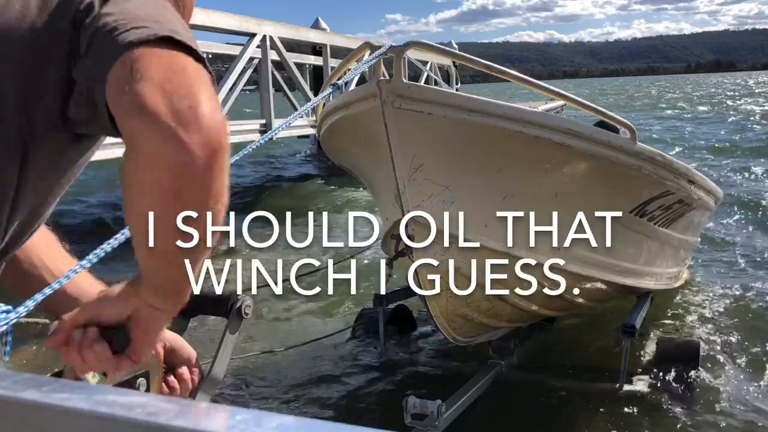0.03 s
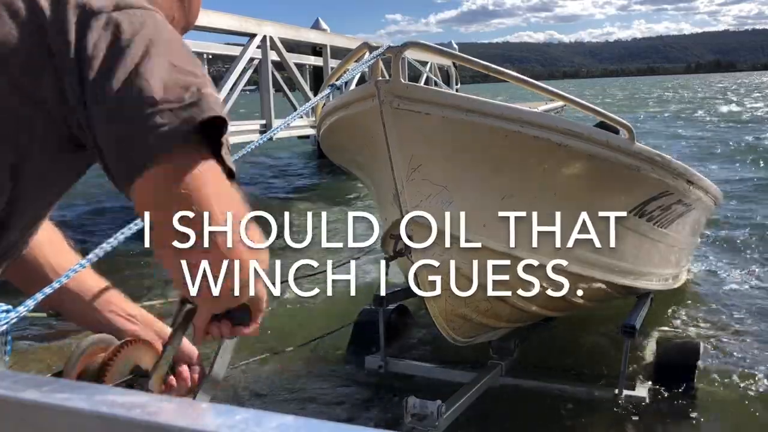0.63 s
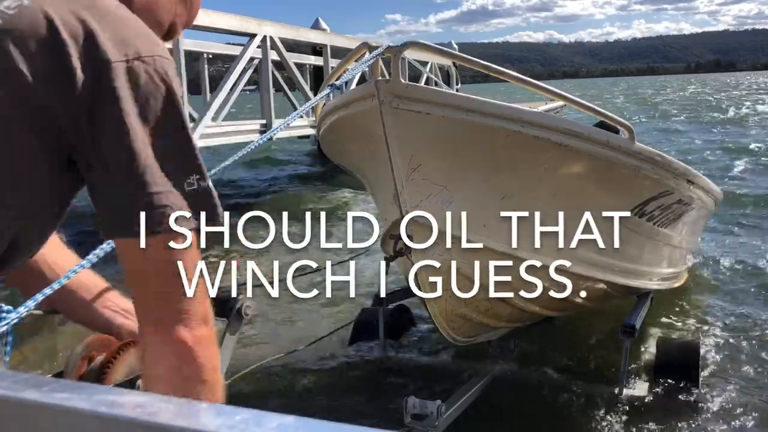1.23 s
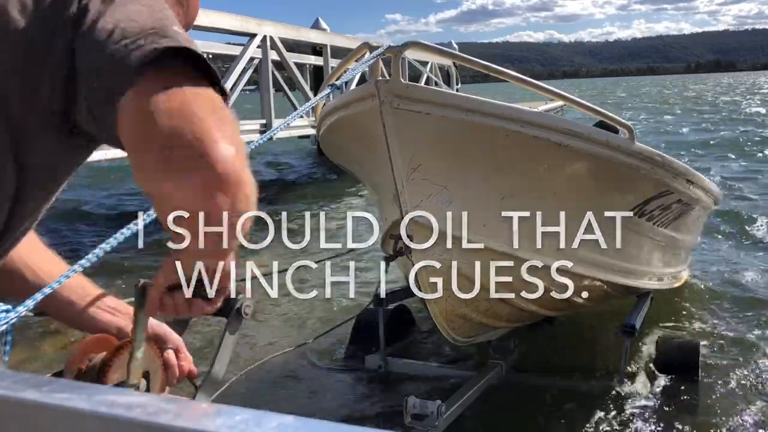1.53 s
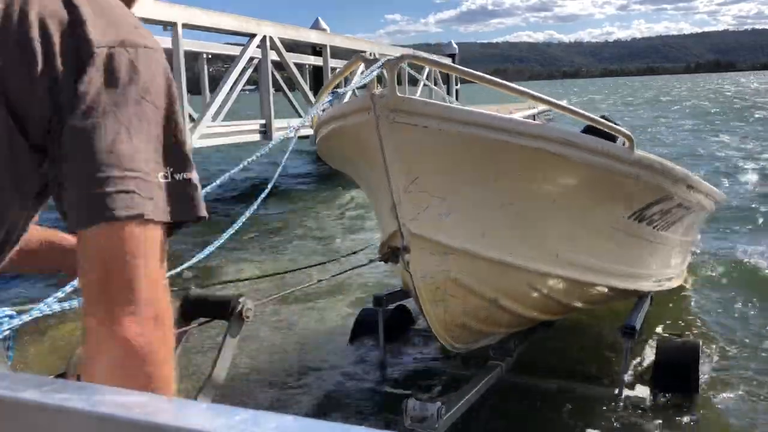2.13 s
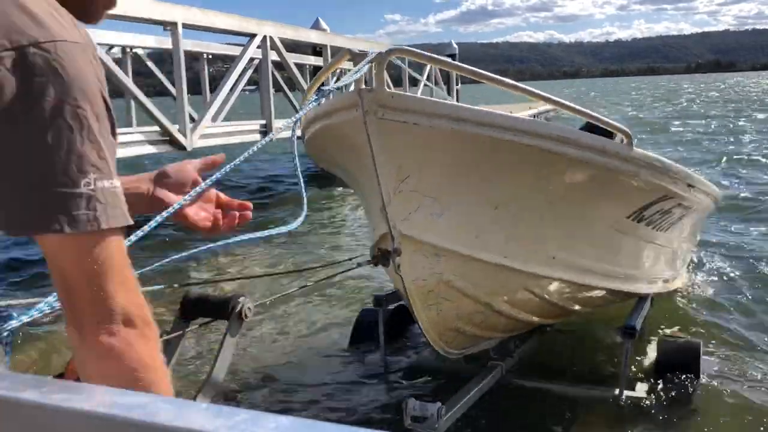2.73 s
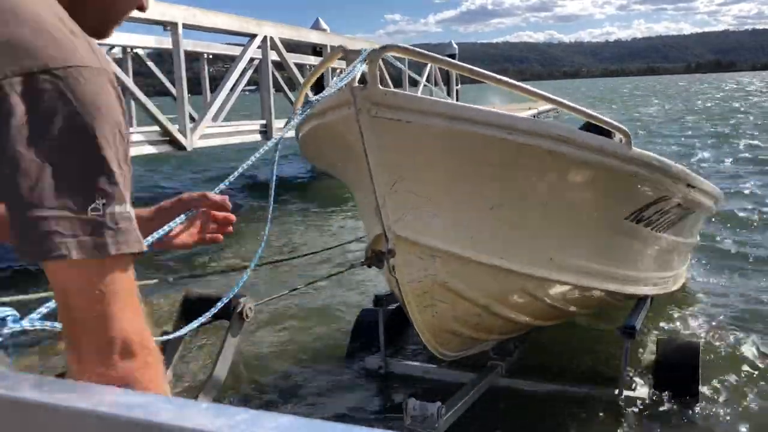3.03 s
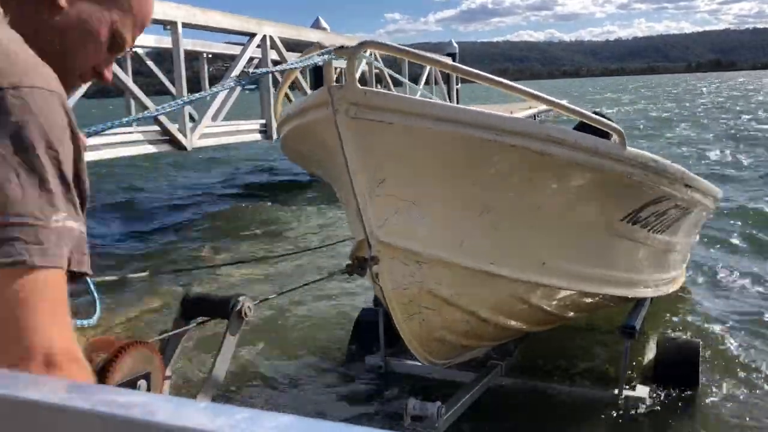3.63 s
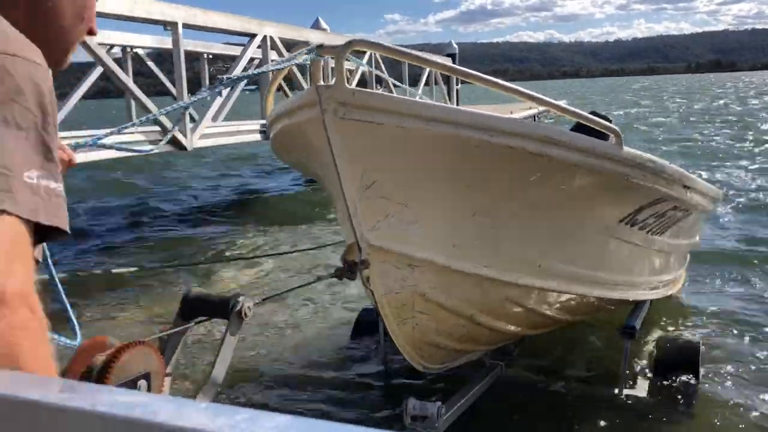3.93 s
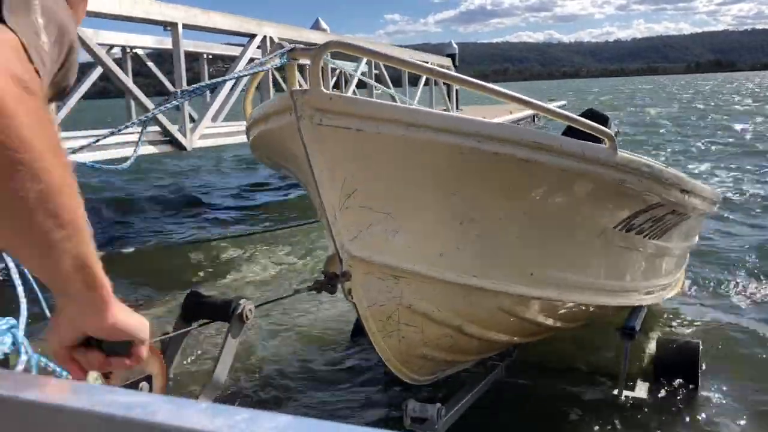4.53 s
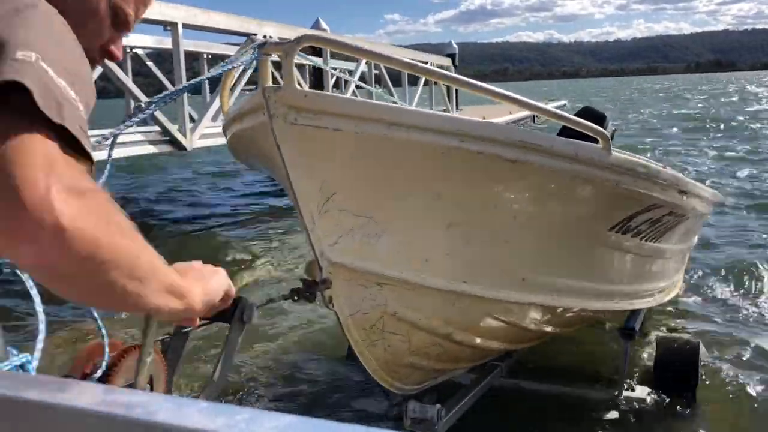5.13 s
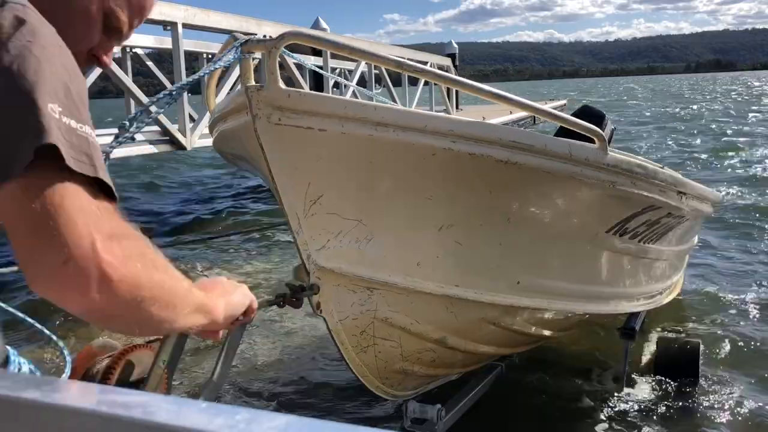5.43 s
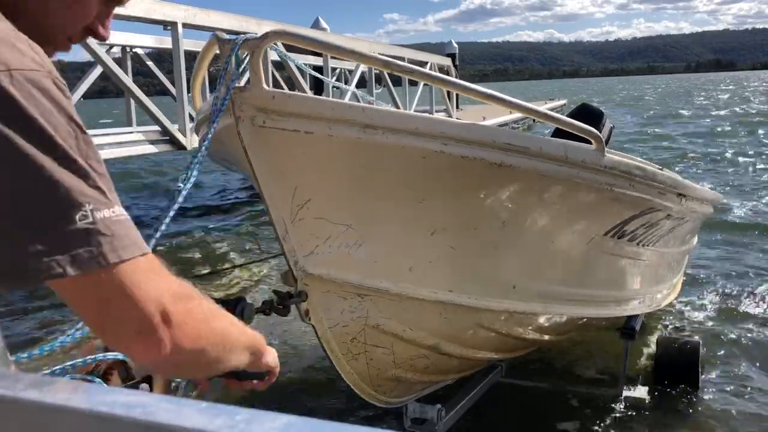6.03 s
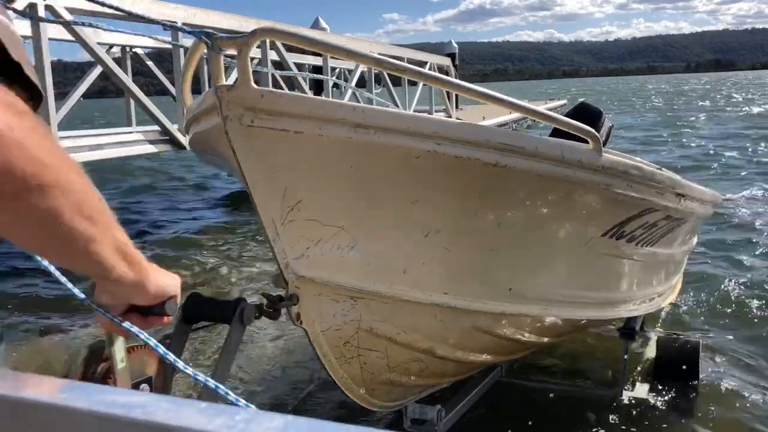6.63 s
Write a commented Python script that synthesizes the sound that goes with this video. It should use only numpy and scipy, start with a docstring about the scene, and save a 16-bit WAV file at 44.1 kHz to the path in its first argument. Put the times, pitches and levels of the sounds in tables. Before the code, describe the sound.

A dry hand winch on a boat trailer is cranked close to the microphone, outdoors by choppy water. At first it turns slowly, each gear tooth chirping and scraping while gusts thump the microphone and waves wash. After about two seconds it spins faster, repeating a squeak, squeal and thin whistle with each turn among ringing ratchet clacks. Near the end it pauses, then makes one more turn over softer wind and water.

```python
"""Choppy water washes and gusts buffet the microphone as a dry hand winch hauls a boat onto its trailer.
Cranked slowly under load, each gear tooth chirps and scrapes by stick-slip friction. The level dips briefly as
the scene changes, and the winch spins fast: each turn runs through squeak, squeal with scraping, whistle and,
at full speed, chatter. The ratchet clacks by impact, and the steel frame resonates with the mechanism."""
import sys
import numpy as np
from scipy import signal
from scipy.fft import rfft, irfft
from scipy.io import wavfile
from scipy.ndimage import uniform_filter1d, map_coordinates

SR = 44100
rng = np.random.default_rng(int(sys.argv[2]) if len(sys.argv) > 2 else 0)


def put_to_file(sound):
    """Save the sound as 16-bit audio at rate SR, in the file named by the first command-line argument."""
    columns = np.atleast_2d(sound).T  # one column per channel
    safe = np.clip(columns, -1, 1)
    whole_steps = np.round(safe * 32767)
    wavfile.write(sys.argv[1], SR, whole_steps.astype(np.int16))


N = 304290
T = np.arange(N) / SR

FAST_FROM_S = 1.876  # the scene changes: slow, heavy cranking, then fast, light spinning
FULL_SPEED_FROM_S, FULL_SPEED_TO_S = 2.4, 5.5
SQUEAK_PLACE, SQUEAK_SHARE = -.1, .11  # shares of a fast turn, counted from its squeal
BAND_LIMIT_HZ = 16050
# Strength of the weather: (t/s, wind level/dB, water level/dB). Levels are relative within each source.
WEATHER = [(0.0, -44, -33.5), (1.61, -43, -33.5), (2.04, -55.5, -41.5), (3.5, -49, -51),
           (4.4, -56.5, -49.5), (5.07, -49.5, -47.5), (5.44, -53.5, -51), (5.882, -45.5, -52),
           (6.19, -56, -45), (6.9, -53.5, -44.5)]


def gain_of(db):
    """Amplitude ratio: tenfold for every 20 dB."""
    return 10 ** (np.asarray(db) / 20)


def unit_rms(x):
    """Normalisation to a mean power of one."""
    return x / np.sqrt(np.mean(x ** 2) + 1e-20)


def add(mix, s, sound):
    """Superposition: a sound joins the mix at s seconds."""
    part = mix[max(round(s * SR), 0):][:len(sound)]
    part += sound[:len(part)]


def wander(n, hz):
    """Smooth random modulation of about unit spread, with a bandwidth near hz."""
    knots = rng.standard_normal(8192)
    coarse = np.arange(0, n + 16, 16)
    curve = map_coordinates(knots, [coarse * 2 * hz / SR], order=3, mode="wrap")
    return np.interp(np.arange(n), coarse, curve)


def butterworth(x, order, hz, kind="low"):
    """Filtering with a maximally flat passband."""
    return signal.sosfilt(signal.butter(order, hz, kind, fs=SR, output="sos"), x)


def colour(x, spectrum, lo_hz=0, hi_hz=SR, size=4096):
    """Minimum-phase filtering; unit white noise comes out with unit power between lo_hz and hi_hz."""
    hz = np.fft.rfftfreq(size, 1 / SR)
    f, db = np.transpose(spectrum)
    gain = gain_of(np.interp(np.log(hz + 1), np.log(f), db))
    gain /= np.sqrt(np.mean(gain ** 2 * ((hz > lo_hz) & (hz < hi_hz))))
    cepstrum = irfft(np.log(gain + 1e-6))
    cepstrum[1:size // 2] *= 2
    cepstrum[size // 2 + 1:] = 0
    return signal.oaconvolve(x, irfft(np.exp(rfft(cepstrum))))[:N]


def swell(length_s, peak_share, edge_s):
    """Rise and fall with energy proportional to length, widened by two edges: (progress, envelope)."""
    length_s = max(length_s, .004)
    u = np.linspace(0, 1, int((length_s + 2 * edge_s) * SR))
    shape = np.sin(np.pi * np.interp(u, [0, peak_share, 1], [0, .5, 1]))
    return u, shape * np.sqrt(length_s * SR / np.sum(shape ** 2))


def by_chance(per_s, spread_db, end_s):
    """A jittered pulse train, one event at random in each interval: (t/s, level offset/dB)."""
    place, size = rng.random((256, 2)).T
    times = (np.arange(len(place)) + place) / per_s
    offsets_db = spread_db * np.sqrt(3) * (2 * size - 1)
    return np.transpose([times, offsets_db])[times < end_s]


def water():
    """Modulated noise: wash of small waves, with faint recorder hiss in the treble, and spattering spray."""
    # Spectrum of the wash, with faint recorder hiss from 8 to 16 kHz: (f/Hz, level/dB)
    wash_and_hiss_spectrum = [(60, -16), (180, -4.5), (600, 1.5), (1000, 3.5), (1600, -1.5), (2800, -3.5),
                              (4500, -7), (8000, -14.5), (16000, -16)]
    # Spectrum of the spray off the wave crests: (f/Hz, level/dB)
    spray_spectrum = [(200, -33), (600, -0.5), (1600, 14.5), (3000, -14.5), (8000, -31)]
    times, _, water_db = np.transpose(WEATHER)
    noise = rng.standard_normal(N) * gain_of(.55 * wander(N, 41))
    wash_and_hiss = colour(noise, wash_and_hiss_spectrum, 480, 3600)
    spray = rng.standard_normal(N) * unit_rms(gain_of(5.3 * wander(N, 30)))
    spray = colour(spray, spray_spectrum, 700, 1900)
    return gain_of(np.interp(T, times, water_db)) * (gain_of(-7) * wash_and_hiss + gain_of(-10.5) * spray)


def eddies():
    """Pressure pulses: strong eddies strike the microphone, and small ones ride on the steady wind."""
    # The strongest eddies: (t/s, length/s, level/dB)
    strong = [(.065, 0.013, -19), (.171, 0.02, -19.5), (.197, 0.032, -27.5), (.266, 0.018, -24.5),
              (.457, 0.014, -14), (.497, 0.02, -20), (1.037, 0.02, -24.5), (1.19, 0.02, -17),
              (1.228, 0.01, -14.5), (1.414, .027, -24), (1.484, 0.031, -21.5), (1.733, 0.031, -31),
              (1.936, 0.027, -31.5), (2.394, .013, -33.5), (2.737, 0.045, -35), (3.043, 0.037, -31),
              (3.174, 0.013, -32.5), (3.353, 0.013, -33.5), (4.054, 0.092, -43), (4.566, 0.015, -31.5),
              (4.622, 0.024, -34.5), (5.018, .03, -33), (5.067, 0.022, -27.5), (5.098, 0.024, -29.5),
              (5.178, 0.031, -33), (5.646, 0.05, -28.5), (5.714, 0.0038, -28.5), (5.87, 0.0054, -31),
              (5.915, 0.02, -26), (5.942, 0.011, -31.5), (5.982, 0.042, -26.5), (6.038, 0.06, -36),
              (6.269, 0.034, -41.5), (6.88, 0.014, -35.5)]
    times, wind_db, _ = np.transpose(WEATHER)
    small = [(s, .018, np.interp(s, times, wind_db) + 7 + db)
             for s, db in by_chance(per_s=9, spread_db=3, end_s=N / SR)]
    out = np.zeros(N)
    for s, length, db in strong + small:
        _, shape = swell(length, peak_share=.21, edge_s=.0034)
        flutter = unit_rms(gain_of(3 * wander(len(shape), 130)))
        eddy = butterworth(shape * flutter * rng.standard_normal(len(shape)), 2, 2500)
        force = np.std(butterworth(eddy, 1, [220, 800], "band"))
        add(out, s - .002, gain_of(db - 15) * eddy / force)
    return out


def wind():
    """Turbulence on the microphone: a lumpy rumble, with sharp puffs that leave a slower thud behind."""
    # Wind spectra during the slow and the fast cranking: (f/Hz, level/dB)
    heavy_spectrum = [(20, -25), (60, 5), (130, 0), (280, -4.5), (600, -5), (1000, -16.5), (1700, -28.5),
                      (4000, -105)]
    light_spectrum = [(30, -48), (70, -10.5), (130, 1.5), (300, 0), (650, -4.5), (1200, -9), (2000, -19),
                      (4000, -29.5)]
    thud_spectrum = [(20, -42), (70, 1.5), (190, 2.5), (450, -19.5), (1500, -92.5)]
    times, wind_db, _ = np.transpose(WEATHER)
    gusts = gain_of(np.interp(T, times, wind_db) + 3.8 * wander(N, 26))
    rumble = butterworth(gusts * rng.standard_normal(N), 1, 450)
    puffs = eddies()
    lag = np.exp(-1 / (.021 * SR))  # time constant 21 ms
    wake = signal.lfilter([1 - lag], [1, -lag], abs(puffs))
    thud = colour(wake * rng.standard_normal(N), thud_spectrum)
    heavy = colour(gain_of(-.5) * puffs + gain_of(3.5) * rumble, heavy_spectrum, 160, 1600)
    heavy += gain_of(14) * thud
    light = colour(gain_of(1.3) * puffs + gain_of(7) * rumble, light_spectrum, 196, 1400)
    light += gain_of(7) * butterworth(thud, 4, 85, "high")
    return np.where(T < FAST_FROM_S, heavy, light)


def teeth():
    """Gear meshing under load, one contact per tooth: (t/s, whistle level/dB, scrape level/dB)."""
    # Runs of evenly spaced teeth: (t/s, number of teeth, whistle level/dB, scrape level/dB)
    mesh = [(0.034, 1, -24.5, -25), (.083, 1, -28, -42), (0.138, 2, -25.5, -25.5), (.231, 2, -29.5, -32),
            (0.312, 1, -31, -27.5), (.356, 3, -25, -29.5), (0.513, 1, -26, -26), (.559, 1, -22, -24),
            (.613, 2, -28, -42), (.712, 1, -46, -54), (0.79, 1, -25, -40), (.84, 1, -46, -34),
            (0.892, 1, -23, -27), (0.956, 2, -40, -25), (1.03, 1, -29, -43.5), (1.087, 1, -31.5, -56),
            (1.142, 1, -55, -50), (1.2, 1, -52, -59), (1.255, 1, -26.5, -26.5), (1.3, 1, -31, -30),
            (1.356, 1, -25.5, -22.5), (1.409, 1, -24, -35), (1.458, 1, -25, -23), (1.512, 1, -20, -25),
            (1.566, 1, -27, -47), (1.623, 1, -14, -21), (1.667, 1, -19.5, -25), (1.704, 1, -27, -31.5),
            (1.747, 1, -24.5, -33), (1.79, 1, -35, -32.5), (1.842, 1, -28.5, -40)]
    times, count, whistle_db, scrape_db = np.transpose(mesh)
    first = np.cumsum(count) - count
    tooth = np.arange(first[-1] + 1)
    return np.transpose([np.interp(tooth, first, column) for column in (times, whistle_db, scrape_db)])


def fast_turns():
    """Rotation repeats the same rubs: each turn's row, with its period/s inserted as second column."""
    # Fast turns, each counted from its squeal: (t/s, squeal level/dB, squeal f/Hz, scrape level/dB,
    # squeak level/dB, whistle level/dB, whistle delay/s, whistle length/s)
    turns = [(1.77, -60, 2210, -47, -60, -26.5, 0.14, 0.13),
             (2.135, -38, 2230, -38.5, -55, -24, 0.14, 0.092),
             (2.447, -39, 2250, -34.5, -37.5, -27, 0.15, .088),
             (2.78, -36, 2268, -35.5, -57, -24, 0.14, .08),
             (3.069, -31, 2248, -35, -43, -22.5, 0.16, 0.067),
             (3.382, -30.5, 2247, -31.5, -36.5, -22.5, 0.13, 0.072),
             (3.647, -30, 2204, -30, -32, -23.5, 0.12, 0.079),
             (3.915, -31, 2272, -30, -31.5, -23.5, .108, 0.11),
             (4.183, -32.5, 2307, -30.5, -36.5, -22.5, 0.11, .074),
             (4.434, -31, 2305, -30, -30.5, -22, 0.14, 0.064),
             (4.704, -28, 2258, -32, -32, -22.5, .132, 0.07),
             (4.978, -27.5, 2290, -29.5, -37, -22, 0.14, 0.069),
             (5.254, -28, 2280, -32.5, -34.5, -24.5, .14, 0.081),
             (5.565, -31, 2307, -35.5, -41.5, -23, 0.16, 0.08),
             (6.489, -31.5, 2307, -35.5, -55, -28.5, .128, .11)]
    rows = np.array(turns)
    period_s = np.minimum(np.diff(rows[:, 0], append=np.inf), .34)  # in a longer wait the handle rests
    return np.insert(rows, 1, period_s, axis=1)


def stick_slip(hz, harmonics_db, jitter, jitter_hz, flutter_db, flutter_hz):
    """Stick-slip oscillation: the pitch trembles and each harmonic flutters as the grip changes."""
    n = len(hz)
    phase = 2 * np.pi * np.cumsum(hz * (1 + jitter * wander(n, jitter_hz))) / SR
    grip = unit_rms(gain_of(flutter_db * wander(n, flutter_hz)))
    tone = np.zeros(n)
    for k, db in enumerate(harmonics_db, 1):
        flutter = unit_rms(gain_of(flutter_db / 2 * wander(n, flutter_hz)))
        if k * hz.mean() < SR / 2:
            tone += gain_of(db) * np.sqrt(2) * flutter * np.sin(k * phase)
    return grip * tone


def whistle_strokes():
    """Intermittent grip, once a slow tooth, twice a fast turn: (t/s, length/s, level/dB, two f/Hz)."""
    # The whistle catches, lets go and catches again:
    # (place and length as shares of the whistle, level/dB, first f/Hz, last f/Hz)
    bursts = [(.02, 0.36, .5, 12090, 11820), (.5, 0.49, -0.5, 12170, 12190)]
    rows = []
    for s, db, _ in teeth():
        length = .021 * np.exp(.42 * min(db + 27.5, 0))  # weaker chirps are also shorter
        rows.append((s, length, db, 12650, 12530))
    for s, *_, db, delay, length in fast_turns():
        rows += [(s + delay + place * length, share * length, db + burst_db, first_hz, last_hz)
                 for place, share, burst_db, first_hz, last_hz in bursts]
    return rows


def whistles():
    """Friction excites the bearing's highest mode: abrupt chirps under load, longer bursts when fast."""
    out = np.zeros(N)
    for s, length, db, first_hz, last_hz in whistle_strokes():
        if s < FAST_FROM_S:
            u, shape = swell(length, peak_share=.35, edge_s=.0013)
            lead_s, grip = .003, dict(jitter=.008, jitter_hz=420, flutter_db=2, flutter_hz=260)
        else:
            u, shape = swell(length, peak_share=.3, edge_s=.004)
            shape = np.sqrt(shape)  # holds its level until the grip lets go
            lead_s, grip = .002, dict(jitter=.009, jitter_hz=190, flutter_db=3.8, flutter_hz=130)
        hz = np.interp(u, [.2, .8], [first_hz, last_hz])
        add(out, s - lead_s, gain_of(db) * shape * stick_slip(hz, [0], **grip))
    return gain_of(.5) * out


def frame(x, ring_db, scatter_db):
    """Resonance and scattering: winch frame and trailer ring on; hull and gangway scatter the sound."""
    # Modes of the steel frame: (f/Hz, bandwidth/Hz, level/dB)
    modes = [(1450, 30, 4), (1567, 54, 5.5), (2402, 24, 6), (3420, 20, -30), (3670, 36, -12),
             (4017, 65, 1.5), (5430, 40, 2), (5500, 32, -5.5), (6700, 55, 4), (7450, 60, 2)]
    t = np.arange(SR // 4) / SR
    ring = np.zeros(len(t))
    for hz, width, db in modes:
        decay = 2 * np.pi * width / SR * np.exp(-np.pi * width * t)
        ring += gain_of(db) * decay * np.cos(2 * np.pi * hz * t)
    scatter = rng.standard_normal(len(t)) * gain_of(-60 * t / .069) * (t > .003)
    response = gain_of(ring_db) * ring + gain_of(scatter_db) * scatter / np.linalg.norm(scatter)
    return x + signal.oaconvolve(x, response)[:N]


def scrape_strokes():
    """Sliding contact at teeth, squeaks, rough spots and whistle catches: (t/s, length/s, level/dB)."""
    # The gears grind where the handle is forced or let go: (t/s, length/s, level/dB)
    grinds = [(.36, .05, -30.5), (.763, 0.051, -32), (1.233, 0.051, -27), (2.075, 0.016, -29),
              (3.051, 0.0086, -28.5), (6.794, 0.081, -38.5)]
    # Rough spots met in every fast turn: (place and length as shares of the turn, level/dB)
    rough_spots = [(0.048, .14, 1), (0.201, .12, -2.5)]
    rows = grinds + [(s + .013, .019, db) for s, _, db in teeth()]  # each tooth bites, then slides off
    for s, turn_s, _, _, db, squeak_db, *_ in fast_turns():
        rows.append((s + SQUEAK_PLACE * turn_s, SQUEAK_SHARE * turn_s, squeak_db + 3))
        rows += [(s + place * turn_s, share * turn_s, db + spot_db)
                 for place, share, spot_db in rough_spots]
    catches = [(s, .0057, db - 13.5) for s, _, db, *_ in whistle_strokes() if s > FAST_FROM_S]
    return rows + catches


def slips(per_s, decay_s, depth):
    """Relaxation: grip breaks at random, and each slip jumps up and dies away over a steady rub."""
    kicks = (rng.random(N) < per_s / SR).astype(float)
    return unit_rms(1 + depth * signal.lfilter([1], [1, -np.exp(-1 / (decay_s * SR))], kicks))


def scrapes():
    """Friction noise: micro-slips rasp through the gears and screech on unsteady, inharmonic partials."""
    # Scraping spectra under load and at speed: (f/Hz, level/dB)
    heavy_spectrum = [(710, -32), (1200, -1.5), (1690, -6), (2280, -11.5), (3330, 1), (4470, -5.5),
                      (5710, 2.5), (9170, -8), (10100, -15.5), (11500, -4), (15000, -10.5), (22000, -120)]
    light_spectrum = [(900, -40), (2000, 6.5), (3300, 3.5), (4100, -1), (5500, 10.5), (7000, 12.5),
                      (8500, 7.5), (11000, 11.5), (13000, 12.5), (16000, 3.5)]
    pressure = np.zeros(N)
    for s, length, db in scrape_strokes():
        _, shape = swell(length, peak_share=.2, edge_s=.0013)
        add(pressure, s - .002, gain_of(db) * shape)
    # the gears keep rubbing between the hard strokes
    rubbing = uniform_filter1d(pressure, int(.14 * SR)) * gain_of(4.5 * wander(N, 35))
    screech = np.zeros(N)
    for hz in np.arange(1700, BAND_LIMIT_HZ, 680):
        pitch = hz + 210 * wander(N, 18) + 55 * wander(N, 190)
        screech += gain_of(5 * wander(N, 40)) * np.sin(2 * np.pi * np.cumsum(pitch) / SR)
    screech, rasp = unit_rms(screech), rng.standard_normal(N)
    heavy = (.85 * rasp + .5 * screech) * slips(per_s=70, decay_s=.005, depth=1.6)
    heavy *= np.hypot(pressure, gain_of(-5.5) * rubbing)
    heavy = colour(heavy, heavy_spectrum[1:-1] + [(16000, -22)])
    light = (.72 * rasp + .68 * screech) * slips(per_s=120, decay_s=.004, depth=1.8)
    light *= np.hypot(pressure, gain_of(-7) * rubbing)
    # at speed the screech never quite stops
    spinning = gain_of(-12) * uniform_filter1d(pressure, int(.3 * SR)) * screech
    light = colour(light + spinning, light_spectrum)
    return np.where(T < FAST_FROM_S, gain_of(-1) * heavy, gain_of(-2.2) * light)


def ratchet(t60_s=.2):
    """Impact: the pawl drops hard or rattles on the teeth, ringing many close modes of the winch."""
    # Hard drops of the pawl: (t/s, level/dB)
    clacks = [(.0478, -28), (.5247, -27), (.9053, -27.5), (1.2336, -17.5), (1.9883, -31), (2.062, -28),
              (2.2682, -23.5), (2.6948, -29), (2.7492, -28.5), (3.0016, -29), (3.0498, -24.5),
              (3.5681, -22.5), (3.7144, -25.5), (3.832, -25), (4.1518, -19), (4.3399, -28.5),
              (4.6661, -21.5), (4.7044, -20), (5.2069, -27.5), (5.7985, -23.5), (6.4293, -26.5),
              (6.5114, -22), (6.7918, -26.5)]
    # Spectrum of the struck winch: (f/Hz, level/dB)
    ring_spectrum = [(300, -29.5), (900, -3), (1700, 3), (2500, 7.5), (3400, 6), (4300, -9.5), (7000, -9.5),
                     (15000, -11)]
    rattle = [(s, db - 34) for s, db in by_chance(per_s=9, spread_db=4, end_s=5.8)]
    out, t = np.zeros(N), np.arange(SR // 4) / SR
    envelope = gain_of(-60 * t / t60_s) + 1.1 * np.exp(-t / .0019)
    for s, db in clacks + rattle:
        add(out, s, gain_of(db) * envelope * rng.standard_normal(len(t)))
    return gain_of(-10.5) * colour(out, ring_spectrum, 1200, 3900)


def squeaks():
    """Mode locking: brief slips settle on one mode of the steel; the high ones are nearly pure."""
    # Stray squeaks of gears and handle: (t/s, length/s, level/dB, f/Hz)
    strays = [(.172, 0.028, -33, 3490), (.243, 0.037, -29, 3560), (.664, 0.02, -29, 3640),
              (.706, .095, -31, 3610), (1.138, 0.015, -28, 3705), (1.61, 0.072, -29, 3570),
              (1.729, 0.038, -32.5, 3490), (2.579, 0.01, -27.5, 8040), (2.722, 0.058, -40.5, 5590),
              (3.319, .042, -47, 5400), (4.553, .007, -32, 8400), (4.654, 0.023, -36, 5440),
              (5.127, 0.015, -34.5, 5950), (4.83, 0.0076, -28, 8380), (6.333, .025, -47.5, 3670),
              (6.399, 0.049, -37.5, 3480), (6.8, 0.043, -33.5, 3430)]
    # Harmonics of a low squeak, from the first upward: (level/dB)
    harmonics = [-3, -8, -16, -26.5]
    strokes = list(strays)
    for s, turn_s, _, _, _, db, _, whistle_delay, _ in fast_turns():
        strokes.append((s + SQUEAK_PLACE * turn_s, SQUEAK_SHARE * turn_s, db, 3380))
        if FULL_SPEED_FROM_S < s < FULL_SPEED_TO_S:  # a high pip just before the whistle
            strokes.append((s + whistle_delay - .018, .015, -39.5, rng.uniform(7830, 8260)))
    out = np.zeros(N)
    for s, length, db, hz in strokes:
        u, shape = swell(length, peak_share=.62, edge_s=.0018)
        pitch = np.full(len(u), hz)
        if hz < 4500:
            tone = stick_slip(pitch, harmonics, jitter=.03, jitter_hz=360, flutter_db=4, flutter_hz=100)
        else:
            tone = stick_slip(pitch, [0, -11], jitter=.014, jitter_hz=120, flutter_db=3.5, flutter_hz=80)
        add(out, s - .004, gain_of(db) * shape * tone)
    return gain_of(2.36) * out


def squeals():
    """Stick-slip of the shaft, once a turn: pitch sags as the handle bears down and climbs as it eases."""
    # Squeals of the slow turns: (t/s, level/dB)
    slow_turns = [(.325, -31.5), (.815, -27), (1.284, -24.5), (1.788, -34)]
    # Pitch through one squeal: (share of its length, frequency ratio)
    pitch_bend = [(0, 1.09), (.16, 1.045), (.33, .98), (.62, 1.04), (1, 1.11)]
    # Harmonics under load and at speed, from the first upward: (level/dB)
    heavy_harmonics = [-1, -2, -8, -9, -15, -16, -16, -12, -15]
    light_harmonics = [0, -8, -6, -11, -17, -17]
    slow = [(s, .061, db, 1623) for s, db in slow_turns]
    fast = [(s, .35 * turn_s, db, hz) for s, turn_s, db, hz, *_ in fast_turns()]
    out = np.zeros(N)
    for s, length, db, hz in slow + fast:
        u, shape = swell(length, peak_share=.36, edge_s=.0099)
        bend = np.interp(u, *np.transpose(pitch_bend))
        if s < FAST_FROM_S:
            tone = stick_slip(hz * bend ** .25, heavy_harmonics,
                              jitter=.022, jitter_hz=450, flutter_db=3.2, flutter_hz=110)
        else:
            tone = stick_slip(hz * bend, light_harmonics,
                              jitter=.016, jitter_hz=310, flutter_db=3.3, flutter_hz=100)
        stutter = unit_rms(gain_of(2.4 * wander(len(u), 40)))
        add(out, s - .008, gain_of(db) * shape * stutter * tone)
    return gain_of(-6) * out


def chatter(count=6):
    """Rolling contact: at full speed the teeth give raspy, gliding chirps on each upstroke."""
    out = np.zeros(N)
    for s, turn_s, *_ in fast_turns():
        if FULL_SPEED_FROM_S < s < FULL_SPEED_TO_S:
            for k, (delay, pitch, glide, size, length) in enumerate(rng.uniform(-.9, 1, (count, 5))):
                u, shape = swell(.018 + .009 * length, peak_share=.35, edge_s=.002)
                hz = (5770 + 550 * pitch) * (1 + .07 * glide * (u - .5))
                tone = stick_slip(hz, [0, -8], jitter=.028, jitter_hz=300, flutter_db=3.5, flutter_hz=110)
                place = .5 + .45 * (k + delay / 2) / count  # second half of the turn
                add(out, s + place * turn_s, gain_of(-48 + 1.3 * size) * shape * tone)
    return out


def scene():
    """Superposition of the winch, heard close by through its frame, with wind and waves."""
    tones = frame(whistles() + squeals() + squeaks() + chatter(), ring_db=.5, scatter_db=-11.5)
    knocks = frame(scrapes() + ratchet(), ring_db=-6.5, scatter_db=-10.5)
    return (tones + knocks + wind() + water())[None]


def record(dry):
    """Attenuation: the level dips briefly as the fast spinning begins; a low-pass limits the treble."""
    dip = gain_of(np.interp(T - FAST_FROM_S, [-.016, -.004, .006, .017], [0, -32, -24, 0]))
    low_pass = signal.firwin(511, BAND_LIMIT_HZ, window=("kaiser", 7), fs=SR)
    return signal.oaconvolve(dry * dip, low_pass[None], "same")


dry = scene()
out = record(dry)
put_to_file(out)
```